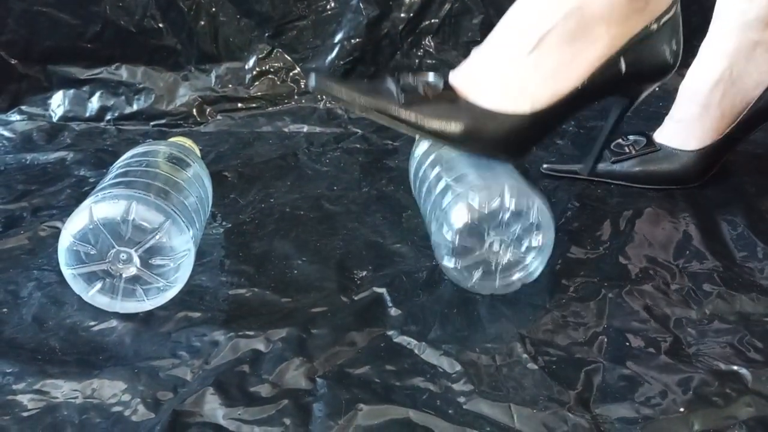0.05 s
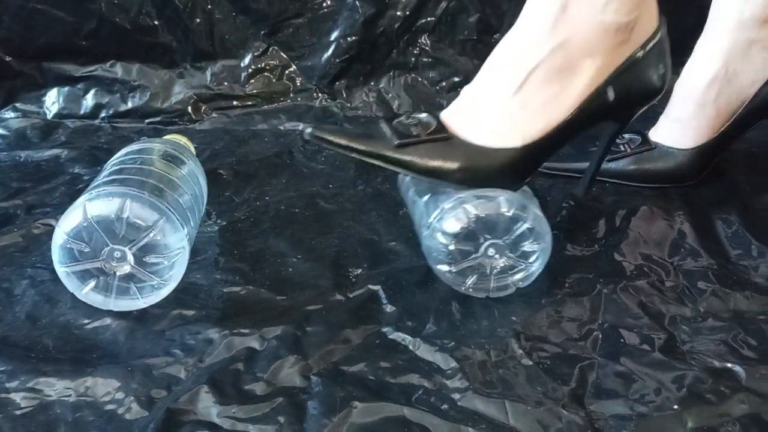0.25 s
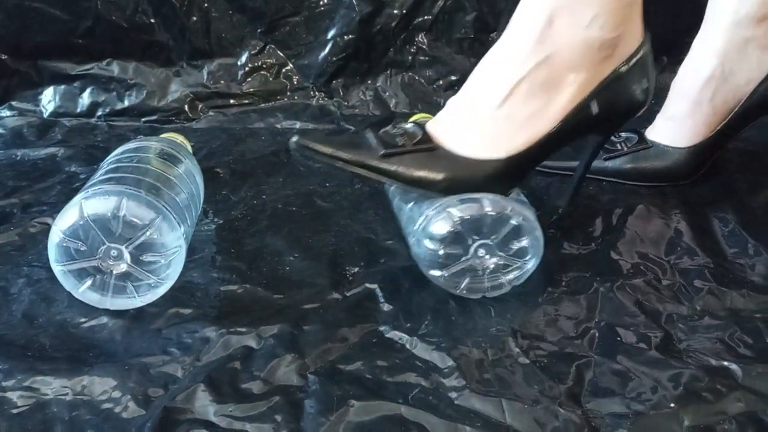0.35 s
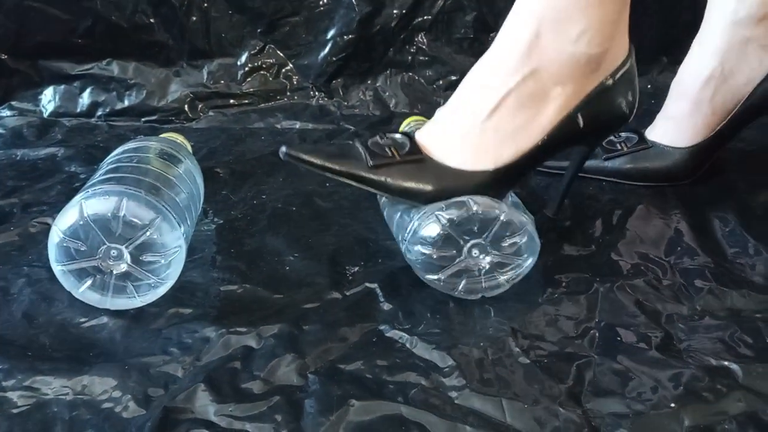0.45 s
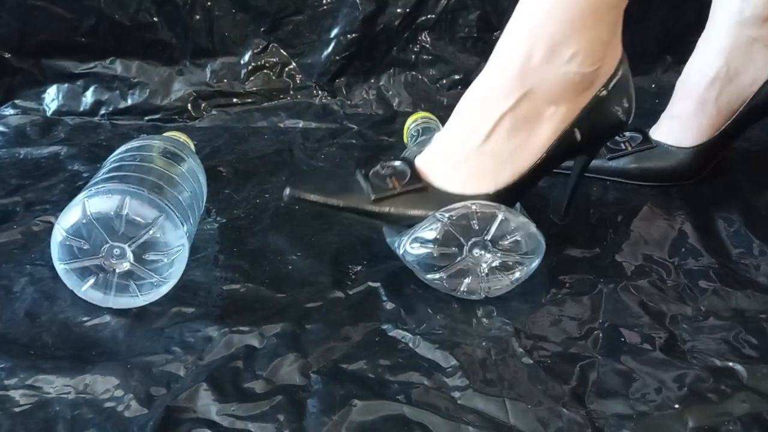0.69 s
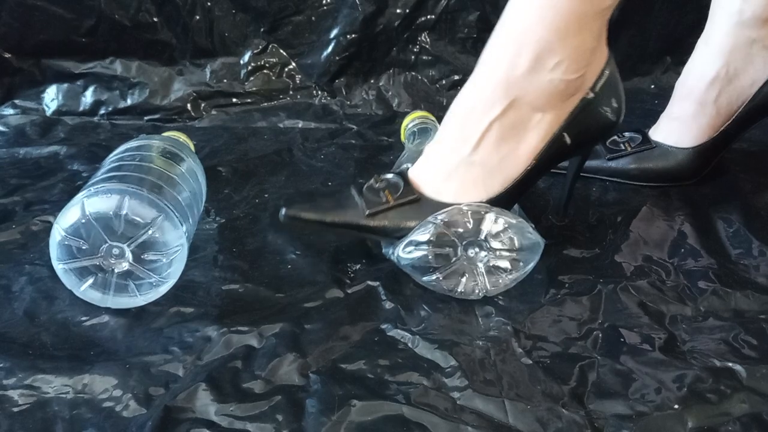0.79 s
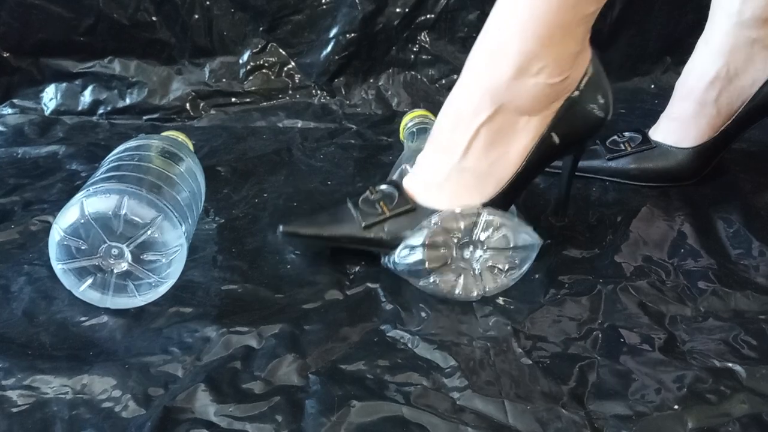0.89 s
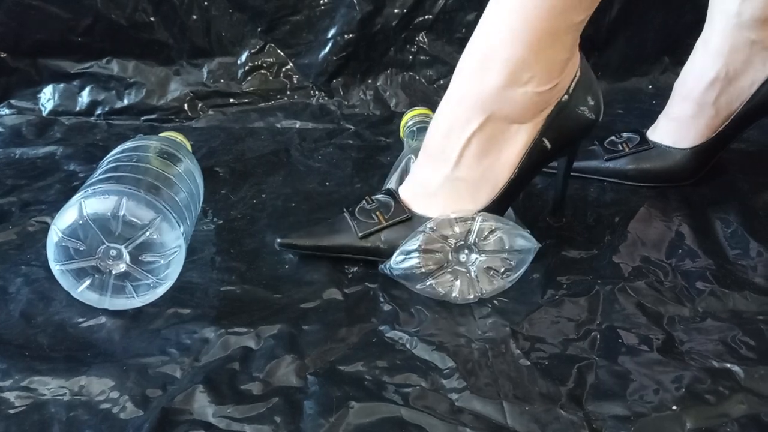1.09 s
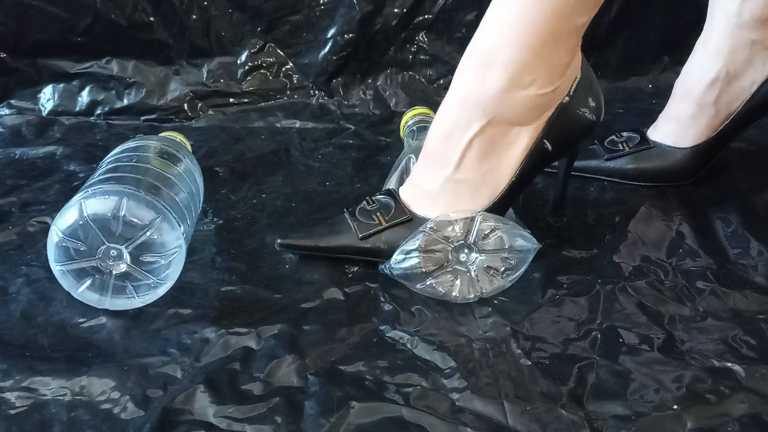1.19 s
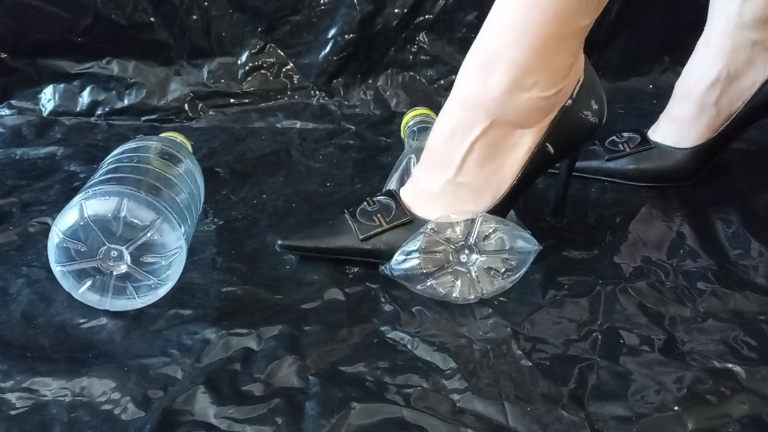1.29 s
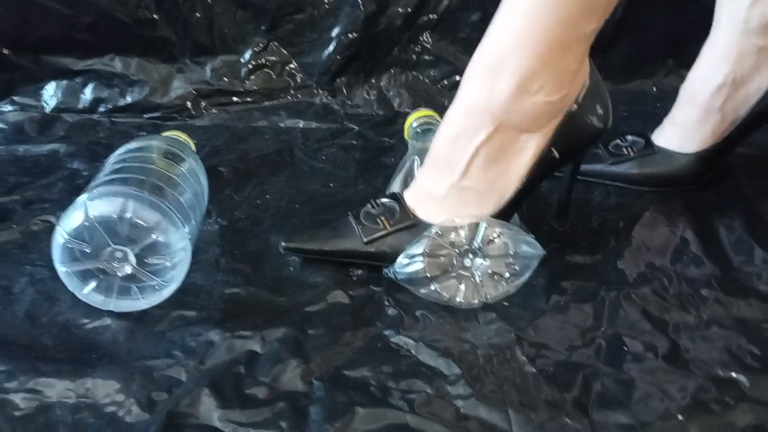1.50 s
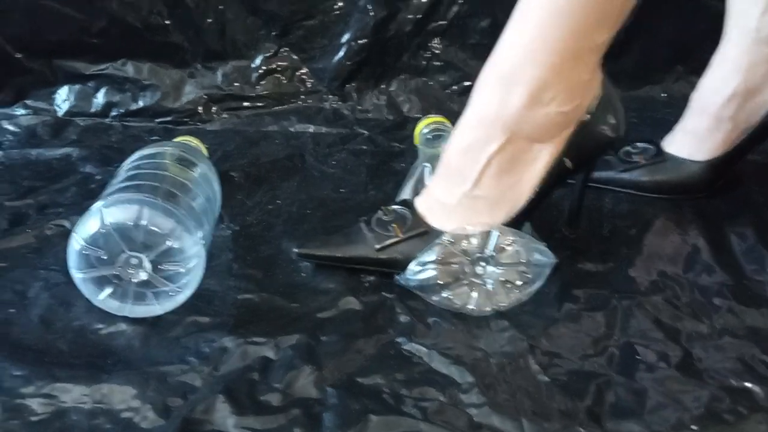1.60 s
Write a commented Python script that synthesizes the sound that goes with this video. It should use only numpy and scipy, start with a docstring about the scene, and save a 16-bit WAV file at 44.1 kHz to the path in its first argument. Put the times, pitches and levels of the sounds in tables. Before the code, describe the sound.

An empty plastic bottle crunches flat under a shoe in sharp snaps and pops.

```python
"""A shoe treads an empty plastic bottle flat on a sheet of plastic film, close by, in a hard-walled room.
The sole touches down, the film starts to crinkle and the air inside the bottle hums. For about a second
the wall gives way in a run of snaps, each a buckling panel, a pop and a cracking crease, and the foot
drops with three soft thuds. The heel lands, one last crack leaves the flat wall shivering,
and a few faint ticks come from the settling plastic."""
import sys
import numpy as np
from scipy import signal
from scipy.io import wavfile

SR = 44100
rng = np.random.default_rng(int(sys.argv[2]) if len(sys.argv) > 2 else 0)


def generate_wav(sig):
    """Save sig (samples, or channels by samples) to the path in sys.argv[1] as 16-bit PCM at SR."""
    pcm = np.round(np.clip(np.atleast_2d(sig).T, -1, 1) * 32767).astype(np.int16)
    wavfile.write(sys.argv[1], SR, pcm)


N = 72765
SIZE = 4096  # samples in one short hit
T = np.arange(SIZE) / SR

# Tone curves of the background and the crinkle. Each row: frequency in Hz, level in dB.
ROOM_TONE_EQ = [(25, -7), (80, 10.5), (700, -13.5), (2000, -9), (5000, -32)]
CRINKLE_EQ = [(80, -34), (200, 3), (500, 20.5), (1100, 15), (2500, 3.5), (5000, 8), (6200, 4),
              (8000, -17.5), (10000, -14.5), (13000, -32), (15500, -8)]
# Fader moves of the crinkle and the air hum. Each row: time in seconds, level in dB.
CRINKLE_FADER = [(.13, -84), (.15, -50), (.235, -74), (.27, -37), (.39, -47), (.44, -38), (.58, -50),
                 (.69, -52.5), (.78, -33), (.86, -47), (.92, -43), (1.06, -38.5), (1.12, -85), (1.555, -87),
                 (1.572, -71), (1.65, -62.5)]
HUM_FADER = [(.132, -105), (.139, -61), (.146, -37), (.21, -57), (.248, -40), (.338, -40.5), (.394, -57),
             (.428, -25.5), (.48, -40), (.522, -34.5), (.636, -34), (.66, -36.5), (.748, -62),
             (.766, -42.5), (.842, -57), (1.05, -48), (1.18, -85), (1.65, -84.5)]
# The bottle's notes as the sole touches it. Each row: pitch in Hz, level in dB, decay in seconds.
TOUCH_MODES = [(486, -47, 0.4), (710, -84, .015), (342, -54.5, 0.08)]
# Faint ticks of the plastic. Each row: start in seconds, tick level in dB, fizz level in dB.
TICKS = [(0.162, -25, -32.5), (1.2755, -47, -46), (1.5205, -32.5, -61), (1.568, -32, -44.5),
         (1.596, -33.5, -62), (1.623, -29.5, -50), (1.642, -30, -50)]
# Snaps of the wall. Each row: start in seconds, buckle level in dB and pitch in Hz, pop level in dB and
# pitch in Hz, crack level in dB and centre in Hz, fizz level in dB, decay of buckle and pop in cycles.
SNAPS = [(0.2439, -17.5, 367, -6.5, 1050, -3.5, 4000, -42, 0.46),
         (0.263, -9, 445, -9, 1170, 1, 3860, -13.5, 1.4),
         (0.2649, -12, 370, -0.5, 940, 0.5, 3870, -40, 0.33),
         (0.2736, -4, 413, -1, 850, -8, 3440, -13, 0.32),
         (0.277, -31, 490, -1, 1710, -2.5, 2980, -37, 0.52),
         (0.3308, -9, 314, -2, 1630, 3, 3650, -46, 0.42), (0.336, -11, 270, -5, 1600, -24, 4200, -50, 0.16),
         (0.411, -11, 375, -10, 1370, -3.5, 4100, -15.5, 0.1),
         (0.42, 0.5, 390, -6, 970, -30, 4200, -24, 0.89), (0.426, -9, 250, -6, 750, -17, 4400, -27, 0.22),
         (0.4316, -10, 223, 0.5, 1210, -28, 4100, -39, 0.44),
         (0.457, -17, 460, -4, 1580, -4.5, 3900, -18, 0.26),
         (0.472, -7, 458, 1.5, 1170, -0.5, 2820, -40, 0.57),
         (0.484, -19, 364, -3, 1110, -9.5, 3150, -45, 0.28),
         (0.522, -3.5, 595, -1, 1010, -4.5, 3070, -35.5, 0.41),
         (0.5256, 7.5, 413, -4.5, 1400, -4, 3260, -25.5, 1.7),
         (0.5293, -1.5, 380, -0.5, 1150, -26, 3080, -30, 0.18),
         (0.539, -3.5, 344, -1, 1570, 0, 3600, -26, 0.25),
         (0.5594, -6.5, 434, 1.5, 780, -3, 5070, -11, 0.63),
         (0.5804, -1, 495, -3, 850, -14.5, 5400, -25, 0.42),
         (0.6187, 1.5, 320, 11, 1080, -8, 3170, -24, 0.56), (0.7108, -3, 472, -2, 1057, 0, 2760, -50, 0.51),
         (0.7176, -23, 516, 2.5, 871, -5, 2870, -37, 0.48),
         (0.721, -1.5, 415, 3.5, 1470, -22, 2900, -32, 0.42),
         (0.747, -24, 495, -29, 1850, -10, 4730, -18, 0.31),
         (0.7526, -37, 334, -0.5, 1280, -26.5, 3600, -22, 0.2),
         (0.755, -10, 412, 2, 1105, 2.5, 3940, -24, 0.64),
         (0.7572, -2, 420, 1.5, 1040, -10.5, 3930, -31, 1.9),
         (0.763, -4.5, 390, 3, 1540, -1.5, 3970, -8, 0.19),
         (0.8751, -1, 400, 3, 900, -4.5, 3520, -10.5, 0.22),
         (0.8763, -3, 520, 0, 1550, -4.5, 4200, -11, 0.27),
         (0.9162, -0.5, 285, 4, 1050, -5.5, 3080, -33, 0.28),
         (0.9201, -17, 400, -13, 1800, -13, 2900, -30, 0.39),
         (0.9343, -6, 457, 0.5, 1620, -1.5, 6260, -19, 0.3),
         (0.9481, -1, 448, 0, 955, -6.5, 4500, -16.5, 0.39),
         (0.967, -13.5, 423, -3.5, 1520, 0, 4500, -33, 0.18),
         (0.977, -8.5, 495, -14.5, 1600, -4.5, 4580, -28, 1.9),
         (0.983, -15, 500, -12.5, 1560, -10, 4550, -36, 0.2),
         (1.004, -8, 346, 4.5, 1400, -4, 4000, -9, 0.26),
         (1.0414, -3.5, 478, -5.5, 1490, -3, 3500, -14, 0.77),
         (1.046, -6, 508, -1, 1076, -4.5, 3220, -33, 0.7),
         (1.0705, -14.5, 520, -3, 1300, -9, 3400, -40, 0.69),
         (1.0777, -31, 530, -12.5, 1150, -1.5, 6800, -21, 0.28),
         (1.0907, -42, 484, -31, 1330, -1, 8200, -22, 0.35),
         (1.2925, -8.5, 555, 4.5, 1182, -3.5, 4900, -15, 0.44)]
# Wall resonances that every pop rings. Each row: pitch in Hz, level in dB, width in Hz.
WALL_MODES = [(994, 1, 97), (1192, -12.5, 17), (1716, -6, 270)]
# Tone curves of the plastic wall's voices. Each row: frequency in Hz, level in dB.
TICK_EQ = [(100, -31.5), (450, -3.5), (1000, 0.5), (1900, -2.5), (3000, -8), (4500, -28), (6200, -29),
           (8000, -46), (15000, -60)]
FIZZ_EQ = [(3000, -34.5), (6500, 8), (7500, -1.5), (8300, -3), (10000, 2.5), (11500, -8), (13500, -12.5),
           (15300, -8)]
RATTLE_EQ = [(200, -40.5), (600, 2), (1000, 1.5), (1700, 4.5), (2400, -0.5), (4000, -37)]
CRACK_EQ = [(500, -19), (1500, -8.5), (2400, -0.5), (3800, -1.5), (5000, -4), (6200, 0), (7300, -12),
            (10000, -12.5), (13000, -34.5)]
SHIVER_EQ = [(300, -25), (450, -8), (540, 0), (680, -7), (1000, -12), (1900, -21.5), (2600, -5),
             (4500, -23.5), (5400, -13), (5850, -6), (6500, -20.5), (7500, -26), (12000, -44)]
# Drops of the foot. Each row: start in seconds, level in dB.
THUDS = [(0.422, -23), (0.618, -16.5), (0.918, -25)]
# Tone curve of the reverb. Each row: frequency in Hz, level in dB.
REVERB_EQ = [(60, -20), (150, 4.5), (300, -5.5), (500, -3.5), (1100, -11), (2000, -2), (2700, -1),
             (4300, -7), (6000, -0.5), (8000, -2), (10000, -0.5), (15000, -2.5)]
# Length of the reverb. Each row: frequency in Hz, time to fall 60 dB in seconds.
REVERB_T60 = [(200, 0.31), (500, 0.23), (1000, 0.28), (2800, 0.31), (6000, 0.24), (10000, 0.16),
              (15000, 0.11)]

BUCKLE_TRIM_DB, POP_TRIM_DB, CRACK_TRIM_DB, FIZZ_TRIM_DB = -2, -2, -1.5, 3.5
THUMP_RISE_S, RATTLE_DECAY_S = 0.00087, 0.0032


def amp(db):
    """Decibels to gain."""
    return 10 ** (np.asarray(db) / 20)


def unit(x):
    """Scales to an energy of one."""
    return x / np.sqrt(np.sum(x ** 2) + 1e-20)


def curve_at(points, hz):
    """Reads a curve on a log-frequency axis."""
    f, value = np.transpose(points)
    return np.interp(np.log(hz + 1), np.log(f), value)


def fader(points):
    """Gain for every sample from a list of fader moves."""
    return amp(np.interp(np.arange(N) / SR, *np.transpose(points)))


def add(mix, start_s, sound):
    """Drops a sound into the mix."""
    part = mix[max(round(start_s * SR), 0):][:len(sound)]
    part += sound[:len(part)]


def eq(x, curve):
    """Shapes a sound to a tone curve with a causal filter."""
    log_gain = np.log(amp(curve_at(curve, abs(np.fft.fftfreq(SIZE, 1 / SR)))))
    taps = np.fft.ifft(np.exp(np.conj(signal.hilbert(log_gain)))).real
    return signal.fftconvolve(x, taps[:SIZE // 2])[:len(x)]


def noise_bed(curve):
    """Steady coloured noise with an RMS of one."""
    return np.sqrt(N) * unit(eq(rng.standard_normal(N), curve))


def ring(hz, decay_s, rise_s):
    """A heavily damped mode with a soft attack."""
    return unit(np.sin(2 * np.pi * hz * T) * np.exp(-T / decay_s) * (1 - np.exp(-T / rise_s)) ** 2)


def reverb(x):
    """The direct sound plus a dense wash off the room's walls that holds, then dies band by band."""
    gap_s, hold_s = 0.004, 0.039
    hz = np.fft.rfftfreq(256, 1 / SR)[:, None]
    t = np.arange(SR // 256) * 128 / SR
    wash = rng.standard_normal((len(hz), len(t))) + 1j * rng.standard_normal((len(hz), len(t)))
    wash *= amp(-60 * np.maximum(t - hold_s, 0) / curve_at(REVERB_T60, hz))
    early_lift_db = 0.5 * (1 - np.clip((t - 0.0046) / 0.0039, 0, 1))
    wash *= amp(early_lift_db) * (t > gap_s)
    response = eq(unit(signal.istft(wash)[1]), REVERB_EQ)
    response[0] += 1  # the direct sound
    return signal.fftconvolve(x, response)


def room_tone():
    """A very quiet, low bed under everything."""
    return amp(-83.5) * noise_bed(ROOM_TONE_EQ)


def crinkle(clicks_per_s=760):
    """Tiny creases and the film under the sole click at random between the snaps."""
    clicks = rng.choice([-1, 1], N) * (rng.random(N) < clicks_per_s / SR)
    return reverb(fader(CRINKLE_FADER) * np.sqrt(N) * unit(eq(clicks, CRINKLE_EQ)))[:N]


def air_hum(neck_hz=165.9, waver_depth=0.051, roughness=0.71):
    """The air in the bottle rings at its neck resonance, wavering as the wall moves."""
    slow_eq = [(35, 17), (70, -0.5), (200, -121), (600, -100)]
    pitch_hz = neck_hz * (1 + waver_depth * noise_bed(slow_eq))
    tone = np.exp(2j * np.pi * np.cumsum(pitch_hz) / SR)
    flutter = 1 + roughness * (noise_bed(slow_eq) + 1j * noise_bed(slow_eq))
    return fader(HUM_FADER) * np.sqrt(N) * unit((tone * flutter).real)


def sole_touch(start_s=0.137, rise_s=0.0037):
    """The sole meets the bottle and sets it ringing softly."""
    out, t = np.zeros(N), np.arange(SR // 2) / SR
    attack = 1 - np.exp(-t / rise_s)
    for hz, db, decay_s in TOUCH_MODES:
        add(out, start_s, amp(db) * np.sin(2 * np.pi * hz * t) * np.exp(-t / decay_s) * attack)
    return out


def scatter(decay_s, click_share):
    """A sharp click, then bending waves that scatter through the thin wall."""
    burst = np.sqrt(1 - click_share) * unit(rng.standard_normal(SIZE) * np.exp(-T / decay_s))
    burst[0] += np.sqrt(click_share)
    return burst


def rattle(curve, decay_s=RATTLE_DECAY_S, click_share=0.4):
    """Scattered waves in one colour of the wall."""
    return unit(eq(scatter(decay_s, click_share), curve))


def fizz():
    """The brightest scattered waves, the top end of a tick or snap."""
    return rattle(FIZZ_EQ, decay_s=0.0031, click_share=0.101)


def ticks():
    """The wall ticks faintly, once under the first touch and again as it settles."""
    out = np.zeros(N)
    for start_s, tick_db, fizz_db in TICKS:
        add(out, start_s, reverb(amp(tick_db) * rattle(TICK_EQ) + amp(fizz_db) * fizz()))
    return out


def buckle(hz, cycles, puff_s=0.0018):
    """A broad panel caves in with a low knock and pushes out a puff of air."""
    puff = unit((1 - T / puff_s) * np.exp(-T / puff_s) * (1 - np.exp(-T / THUMP_RISE_S)))
    return ring(hz, decay_s=cycles / hz, rise_s=0.51 / hz) + amp(-19.5) * puff


def pop(hz, cycles):
    """A small panel pops, rattles and rings the modes of the wall."""
    panel = ring(hz, decay_s=cycles / hz, rise_s=0.75 / hz)
    scattered = unit(signal.fftconvolve(scatter(RATTLE_DECAY_S, click_share=0.65), panel)[:SIZE])
    hit = unit(scattered + 0.35 * rattle(RATTLE_EQ))
    # a small panel radiates little bass
    hit = signal.lfilter(*signal.butter(2, 0.38 * hz, "high", fs=SR), hit)
    ringing = sum(amp(db) * signal.lfilter(*signal.iirpeak(mode_hz, mode_hz / width_hz, SR), hit)
                  for mode_hz, db, width_hz in WALL_MODES)
    return unit(hit + ringing)


def crack(centre_hz, fall_db_per_octave=13.5):
    """The crease between the panels cracks: a bright burst that rolls off either side of its centre."""
    curve = [(hz, db - fall_db_per_octave * abs(np.log2(hz / centre_hz))) for hz, db in CRACK_EQ]
    return rattle(curve, decay_s=0.0035, click_share=0.13)


def snaps():
    """The wall gives way; each snap radiates its own way, so the room answers each differently."""
    out = np.zeros(N)
    for start_s, buckle_db, buckle_hz, pop_db, pop_hz, crack_db, crack_hz, fizz_db, cycles in SNAPS:
        snap = (amp(BUCKLE_TRIM_DB + buckle_db) * buckle(buckle_hz, cycles)
                + amp(POP_TRIM_DB + pop_db) * pop(pop_hz, cycles)
                + amp(CRACK_TRIM_DB + crack_db) * crack(crack_hz)
                + amp(FIZZ_TRIM_DB + fizz_db) * fizz())
        add(out, start_s, reverb(snap))
    return out


def thuds():
    """The sole drops as the wall gives way and lands with a short, deep push."""
    out = np.zeros(N)
    for start_s, db in THUDS:
        add(out, start_s, amp(db) * ring(hz=119, decay_s=0.0024, rise_s=THUMP_RISE_S))
    return out


def heel(start_s=1.216):
    """The heel meets the floor: a dry thump, with a knock and a click that carry into the room."""
    thump = amp(-13) * ring(hz=187, decay_s=0.011, rise_s=THUMP_RISE_S)
    knock = amp(-22.5) * ring(hz=334, decay_s=0.0013, rise_s=THUMP_RISE_S)
    click = amp(-30.5) * rattle(RATTLE_EQ)
    out = np.zeros(N)
    add(out, start_s, thump)
    add(out, start_s, reverb(knock + click))
    return out


def shiver(start_s=1.305, rise_s=0.0022, decay_s=0.037):
    """A brief, noisy after-ring of the flattened wall follows the last crack."""
    t = np.maximum(np.arange(N) / SR - start_s, 0)
    swell = (1 - np.exp(-t / rise_s)) ** 2 * np.exp(-t / decay_s)
    return amp(0.5) * unit(eq(swell * rng.standard_normal(N), SHIVER_EQ))


def scene(low_cut_hz=149):
    """The mono mix: the light bottle and shoe radiate little bass; room tone and thuds keep theirs."""
    bed = room_tone()
    light_layers = crinkle() + air_hum() + sole_touch() + ticks() + snaps() + heel() + shiver()
    low_cut = signal.butter(4, low_cut_hz, "high", fs=SR, output="sos")
    return (bed + signal.sosfilt(low_cut, light_layers) + thuds())[None]


def record(dry):
    """A steep high cut at 16.1 kHz takes off the very top."""
    high_cut = signal.firwin(255, 16100, window=("kaiser", 9), fs=SR)
    return signal.oaconvolve(dry, high_cut[None], "same")


dry = scene()
out = record(dry)
generate_wav(out)
```